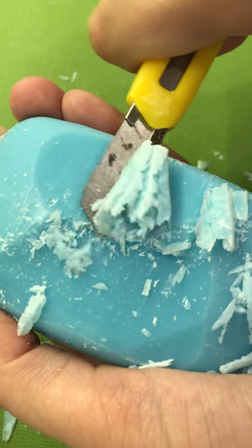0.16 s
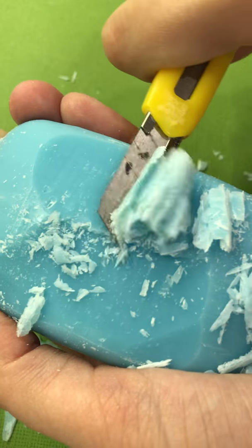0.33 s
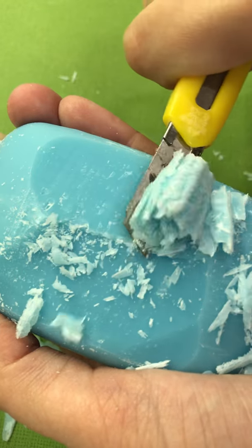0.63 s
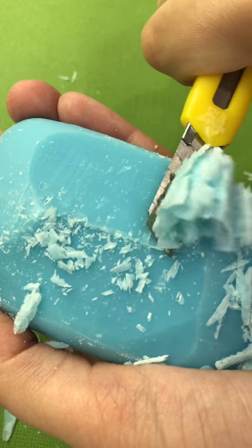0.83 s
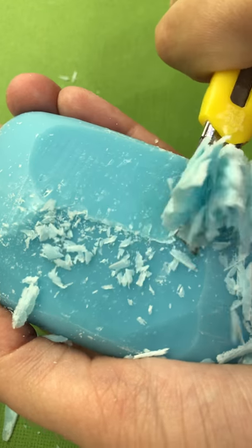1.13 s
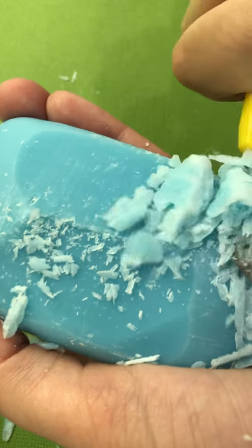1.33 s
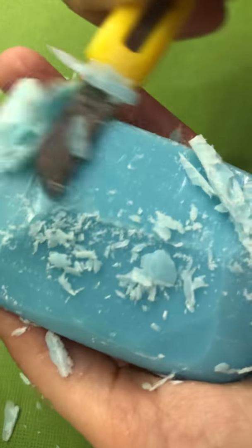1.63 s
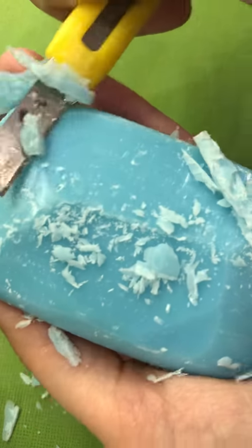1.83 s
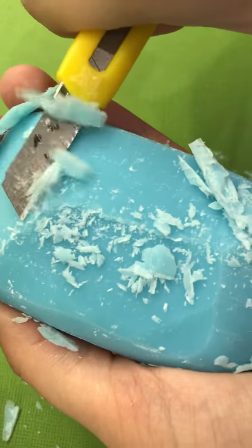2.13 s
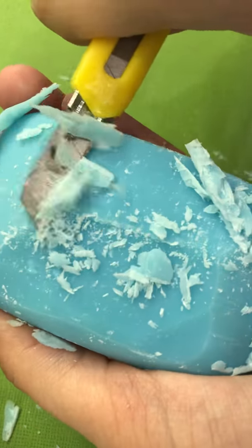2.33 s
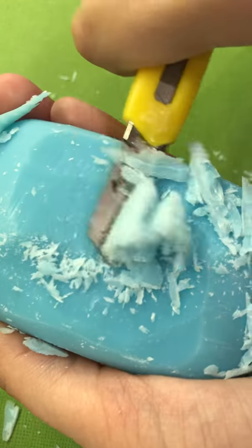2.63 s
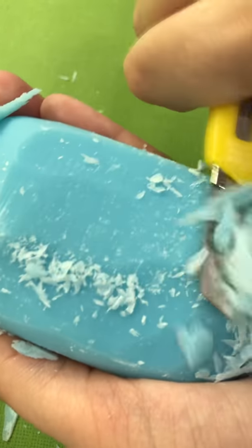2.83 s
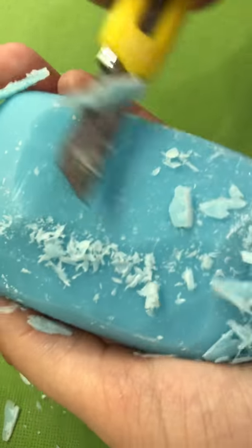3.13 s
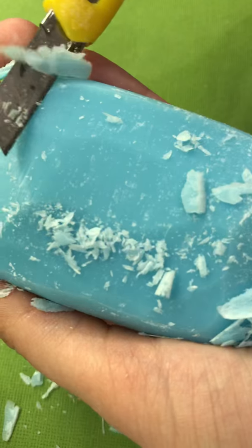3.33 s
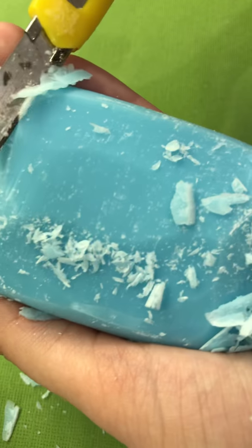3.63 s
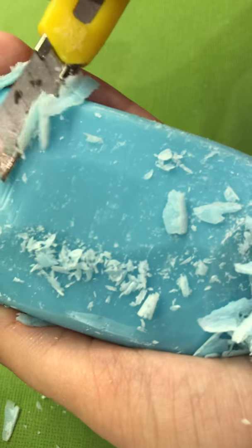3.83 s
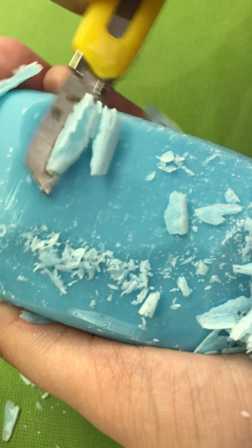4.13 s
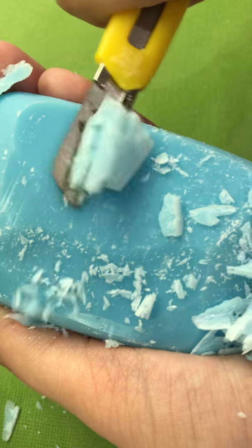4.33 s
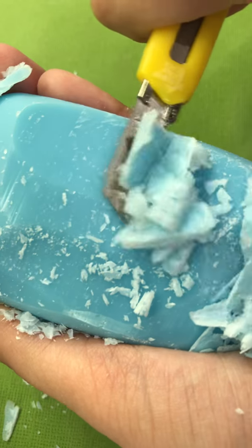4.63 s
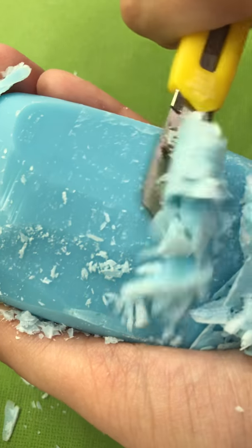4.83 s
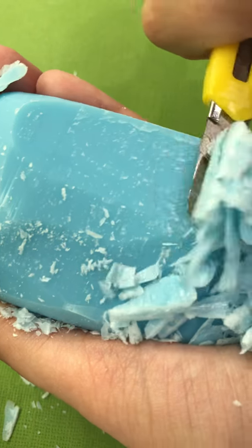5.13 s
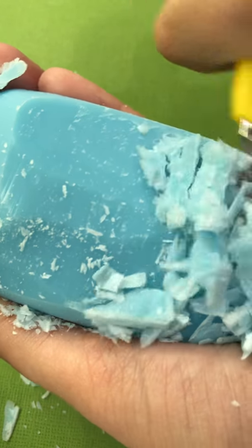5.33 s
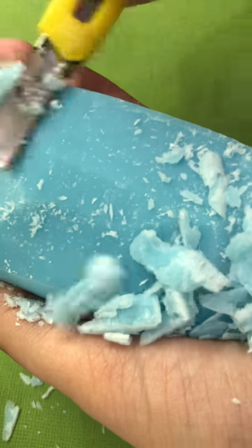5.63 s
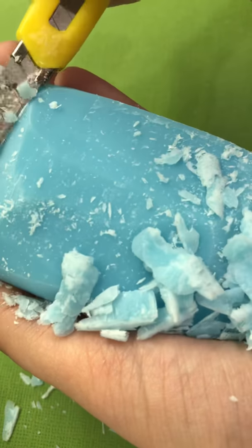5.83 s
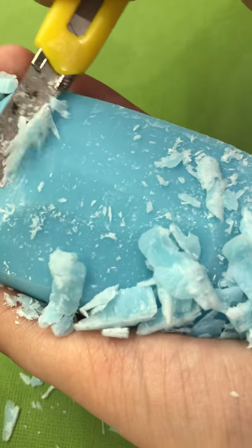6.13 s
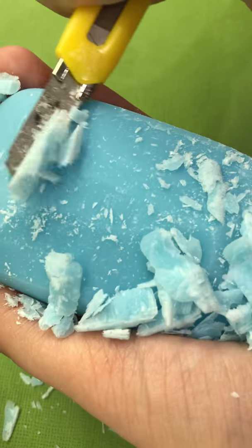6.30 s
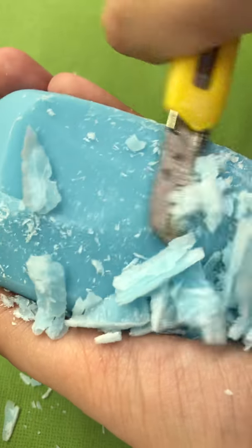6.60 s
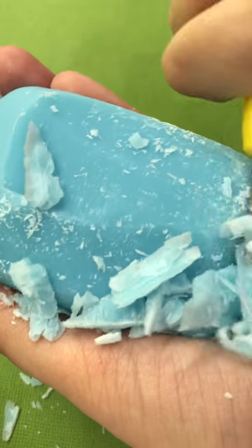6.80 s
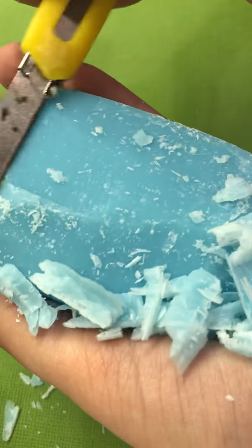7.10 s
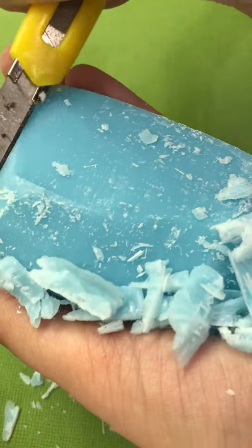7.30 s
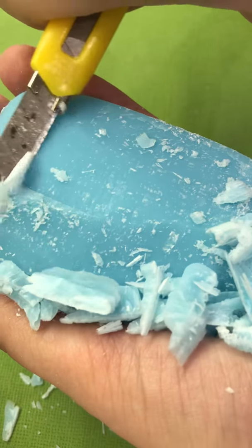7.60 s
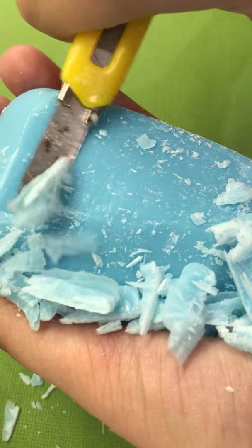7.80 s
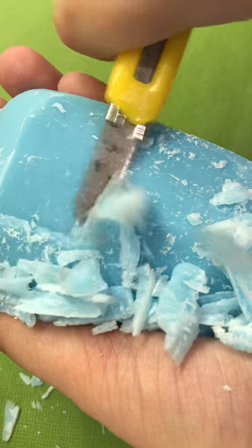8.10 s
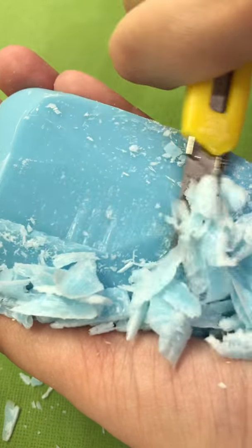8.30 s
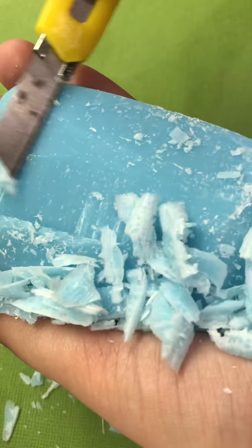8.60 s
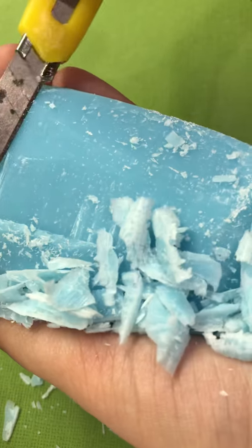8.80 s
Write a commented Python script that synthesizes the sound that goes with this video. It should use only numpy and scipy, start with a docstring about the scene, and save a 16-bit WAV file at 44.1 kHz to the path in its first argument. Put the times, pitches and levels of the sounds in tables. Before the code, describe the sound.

Close, dry soap carving: irregular sharp snaps and crackles from breaking flakes, grainy rubbing of the blade, faint room hum and hiss.

```python
"""Brittle cracks, soft rubs and crackling crumbs, over a low hum and hiss: a thin snap-off blade
shaves a dry bar of soap held in the hand, close to a phone in a quiet room.
Each crack is a burst of force that rings knife and bar, the flake itself, and a bright snap.
Slips, scrapes and stray crumbs drive the same resonances with grainy noise; big flakes knock the bar.
Hum, hiss and dull hand thuds are shaped noise; decaying noise gives the near and late room."""
import sys
import numpy as np
from scipy import signal
from scipy.fft import rfft, irfft, next_fast_len
from scipy.io import wavfile
from scipy.ndimage import map_coordinates

SR = 44100
rng = np.random.default_rng(int(sys.argv[2]) if len(sys.argv) > 2 else 0)


def transcribe(u):
    """Save the signal u as a 16-bit wav file named by the first command-line argument.

    u: samples, shape (n,) or (channels, n), limited to [-1, 1]; the rate is SR.
    q: integer samples, one column per channel.
    """
    v = np.clip(np.atleast_2d(u).T, -1, 1)
    q = np.round(v * 32767).astype(np.int16)
    wavfile.write(sys.argv[1], SR, q)


N = 394694
FORCE_SAMPLES = 2048  # length of one force burst
SWELL_STEP = 64  # samples per gain step

# resonances of knife and bar: (centre [Hz], width [Hz], relative level [dB])
KNIFE_MODES = [(596, 330, 0.5), (970, 330, 2), (1342, 270, 0.5), (1549, 170, -3), (2205, 249, 2),
               (2565, 230, 0), (3290, 320, 2.5), (4470, 400, -6.5)]
# resonances of the flake: (centre [Hz], width [Hz], relative level [dB])
FLAKE_MODES = [(4510, 1300, -9.5), (5500, 1010, 0), (6430, 516, 0.5), (6854, 410, -2), (8620, 1020, -5.5)]
# resonances of the bright snap: (centre [Hz], width [Hz], relative level [dB])
SNAP_MODES = [(9295, 890, -6), (11260, 430, -1), (12630, 1500, -3.5), (15100, 980, -5)]


def amp(db):
    """Gain of a level in dB."""
    return 10 ** (np.asarray(db) / 20)


def unit(x):
    """x at rms 1."""
    return x / np.sqrt(np.mean(x ** 2) + 1e-20)


def along(points, hz):
    """Interpolate (Hz, value) points on a log frequency axis."""
    point_hz, values = np.transpose(points)
    return np.interp(np.log(hz + 1), np.log(point_hz + 1), values)


def wobble(knots_per_s):
    """Smooth random curve through normal-distributed knots."""
    knots = rng.standard_normal(int(N * knots_per_s / SR) + 4)
    return map_coordinates(knots, [np.arange(N) * knots_per_s / SR])


def filtered(x, response):
    """x times a complex response of frequency."""
    size = next_fast_len(N + SR // 2)
    hz = np.fft.rfftfreq(size, 1 / SR)
    return irfft(rfft(x, size) * response(hz), size)[..., :N]


def shaped_noise(response):
    """White noise through a response, rms 1."""
    return unit(filtered(rng.standard_normal(N), response))


def resonances(hz, modes):
    """One causal second-order resonance per mode, of alternating sign."""
    centre_hz, width_hz, db = np.moveaxis(modes, -1, 0)[..., None]
    sign = (-1.) ** np.arange(centre_hz.shape[-2])[:, None]
    damping = 1j * hz * width_hz
    return sign * amp(db) * damping / (centre_hz ** 2 - hz ** 2 + damping)


def rung(x, modes):
    """x through the summed resonances of a body."""
    return filtered(x, lambda hz: resonances(hz, modes).sum(0))


def struck(start_s, peak_db, force, modes, scatter_db, best_hz=None, fall_db_per_octave=0):
    """Each force row rings modes of new strengths; the grip pulls the nearest mode to best_hz."""
    body = np.tile(np.array(modes, float), (len(start_s), 1, 1))
    body[..., 2] += scatter_db * rng.standard_normal((len(start_s), len(modes)))
    if best_hz is not None:
        octaves = np.abs(np.log2(body[..., 0] / best_hz[:, None]))
        body[..., 2] -= fall_db_per_octave * (octaves - octaves.min(1)[:, None])
        rows, nearest = np.arange(len(start_s)), octaves.argmin(1)
        body[rows, nearest, 0] = best_hz
        body[rows, nearest, 2] = np.max(modes, axis=0)[2]  # top level of the mode table
    size = 2 * force.shape[1]
    response = resonances(np.fft.rfftfreq(size, 1 / SR), body).sum(1)
    sound = irfft(rfft(force, size) * response, size)
    sound *= (amp(peak_db) / np.abs(sound).max(1))[:, None]
    first = np.round(np.clip(start_s, 0, None) * SR).astype(int)
    at = first[:, None] + np.arange(size)
    return np.bincount(at.ravel(), sound.ravel(), N + SR)[:N]


def breaking(count, rise_s, t60_s, crumble_db, crumble_t60_s, jolt_db):
    """Force of a break: a quick noisy tear, one sharp jolt, then small follow-up breaks that die away."""
    jolt_s = 0.0008  # from the start of the tear
    t = np.arange(FORCE_SAMPLES) / SR
    tear = amp(-60 * t / t60_s) * (1 - np.exp(-(t / rise_s) ** 2))
    pieces_db = np.repeat(4 * rng.standard_normal((count, 32)), 64, axis=1)  # 32 pieces of 64 samples
    crumble = amp(crumble_db - 60 * t / crumble_t60_s + pieces_db)
    jolt = amp(jolt_db) * (np.arange(len(t)) == round(jolt_s * SR))
    return jolt + (tear + crumble * (t > rise_s)) * rng.standard_normal((count, len(t)))


def grit(breaks_per_s, spread_db):
    """Scattered tiny breaks of unequal size, in clumps, rms 1."""
    breaks = rng.random(N) < breaks_per_s / SR * amp(5 * wobble(40))
    size = amp(spread_db * np.minimum(rng.exponential(size=N), 3.5))
    return unit(breaks * rng.standard_normal(N) * size)


def swells(start_s, held_s, db, rise_db_per_s, fall_db_per_s):
    """Summed gain of events that rise to full strength at start_s, hold and fall at steady dB rates."""
    t = np.arange(0, N, SWELL_STEP) / SR - start_s[:, None]
    rise_db = rise_db_per_s * np.minimum(t, 0)
    fall_db = fall_db_per_s * np.maximum(t - held_s[:, None], 0)
    gain = amp(db[:, None] + rise_db - fall_db).sum(0)
    return np.repeat(gain, SWELL_STEP)[:N]


def cracks():
    """Each crack drives three bodies; the heavy knife speaks slower than flake and snap."""
    # cracks: (start [s], knife-and-bar peak [dB], strongest knife ring [Hz], flake peak [dB], snap peak [dB])
    crack_table = [(0.0075, -43.5, 3230, -52.5, -62), (0.0645, -46, 3150, -54, -57),
                   (0.115, -43.5, 2600, -51, -54), (0.2157, -50.5, 2420, -52, -54),
                   (0.317, -44, 3220, -57, -53), (0.6348, -58, 3400, -49, -40),
                   (0.846, -58, 2620.0, -54, -43), (0.8709, -53, 3300, -43, -37.5),
                   (0.894, -58, 3300, -55, -57), (0.911, -67, 3270.0, -42, -41.5),
                   (1.0667, -42, 2873, -39, -38), (1.1536, -55, 3750, -40.5, -45),
                   (1.166, -59, 3300, -46, -59), (1.2325, -49.5, 3420, -42.5, -45),
                   (1.2716, -42, 4240, -39.5, -34.5), (1.2992, -40.5, 4200, -46, -53),
                   (1.3265, -52, 4190.0, -41, -44), (1.4264, -49, 885, -40, -43),
                   (1.478, -47, 2120, -39.5, -61), (1.506, -49, 2170, -34, -36),
                   (1.508, -43.5, 2150, -34.5, -36), (1.537, -52.5, 2140.0, -47, -43),
                   (1.5723, -73, 3200.0, -45.5, -63), (1.6334, -40.5, 3330, -32.5, -30.5),
                   (1.6438, -49, 3000.0, -28, -55), (1.651, -58, 3550.0, -31, -46),
                   (1.6572, -45, 3790.0, -28, -51.0), (1.701, -46.5, 3400.0, -33.5, -61),
                   (1.753, -53.5, 3340.0, -47.5, -59), (1.821, -55, 1590, -42, -38),
                   (1.827, -45, 2280, -59, -61), (1.869, -44.5, 2680, -46, -49),
                   (1.899, -63, 3920.0, -35, -39), (1.9069, -62, 3920.0, -22, -21.5),
                   (1.9513, -46, 3650, -38, -61), (1.975, -71, 3040.0, -42, -43),
                   (2.094, -54, 640.0, -41.5, -40), (2.1303, -64, 4200, -48, -50),
                   (2.135, -45, 3900, -26.5, -25.5), (2.1662, -48, 1040, -35, -50),
                   (2.183, -62, 4400, -40, -45), (2.1863, -35.5, 3050, -45.5, -46),
                   (2.2208, -40, 2660, -37, -49), (2.228, -63, 2750.0, -42, -38),
                   (2.2362, -39, 2830, -42, -57), (2.263, -67, 3000, -46, -51),
                   (2.277, -37, 3050, -51, -62), (2.333, -40.5, 3080, -51, -56),
                   (2.429, -43.5, 3100, -46.5, -42), (2.514, -46.5, 2620, -53, -50),
                   (2.753, -55.5, 3260, -60, -45), (2.76, -48, 2230, -49, -52),
                   (2.798, -58, 2500.0, -40.5, -38), (2.9365, -16.5, 3290, -12.5, -11),
                   (2.9837, -64.5, 2370, -38, -44), (3.067, -27, 2175, -34.5, -25),
                   (3.089, -39, 3530, -43, -41), (3.097, -39.5, 2580, -58, -37),
                   (3.167, -60, 3600, -41, -44), (3.2514, -42, 1442, -33, -48),
                   (3.262, -40.5, 2100, -29, -36), (3.28, -34, 2820, -16.5, -27),
                   (3.285, -36.5, 1490, -21, -27), (3.314, -40.5, 3360, -44, -60),
                   (3.332, -58, 3900, -42, -52), (3.352, -37, 4130, -37, -43),
                   (3.3934, -71.5, 3940.0, -31, -35), (3.438, -64, 3600, -48, -53),
                   (3.47, -66, 3650, -46.5, -43), (3.6669, -47.5, 3040, -54.5, -77),
                   (3.7447, -46.5, 2570, -59, -77), (4.2447, -42.5, 2310, -52.5, -47),
                   (4.296, -58, 3300, -38, -44), (4.3, -39.5, 3400, -22.5, -25),
                   (4.3554, -54, 1530, -42, -56), (4.4988, -53, 2340, -54, -31.5),
                   (4.503, -49.5, 2150, -47, -57), (4.612, -70, 1170.0, -63, -45.5),
                   (4.714, -71, 1330, -51.5, -51.5), (4.749, -53, 2510, -57, -41),
                   (4.903, -59, 2300, -52.5, -52), (5.076, -49.5, 2280, -45, -48),
                   (5.24, -53, 3280, -42, -69), (5.275, -41.5, 2270, -48, -52),
                   (5.432, -32.5, 3440, -37.5, -44), (5.463, -46, 2490, -40.5, -46),
                   (5.499, -35, 2350, -44, -37), (5.512, -37, 3200, -55, -30),
                   (5.555, -40, 3200, -43.5, -69), (5.58, -48, 2320, -55, -46),
                   (5.726, -49, 2980, -65, -62), (5.7468, -58, 3360.0, -29.5, -24),
                   (5.769, -46.5, 3400, -43, -40), (5.7846, -55, 3860, -46, -33),
                   (5.7932, -52, 4400, -39, -45), (5.8105, -68, 3960.0, -40.5, -43),
                   (5.856, -61.5, 4400, -44, -60), (5.864, -45, 3140, -44, -58),
                   (5.8875, -66, 3300, -52, -50), (5.897, -56, 3300, -41, -56),
                   (5.915, -50, 3050.0, -34, -45.0), (5.9225, -49, 1440, -25.5, -30),
                   (5.928, -44, 1420, -24.5, -36), (5.9555, -67, 4400, -45, -60),
                   (5.9703, -24, 2300, -24, -28), (5.996, -65, 4030, -24.5, -52),
                   (6.186, -45, 3050, -51.5, -53.5), (6.3083, -84, 2080, -51.5, -42),
                   (6.386, -58, 1750, -50.5, -41.5), (6.5269, -49, 2290, -49, -37),
                   (6.532, -47.5, 1960, -52, -48), (6.591, -36.5, 2090, -48, -44),
                   (6.743, -39, 1570, -36.5, -37), (6.7637, -40, 2600, -25, -33),
                   (6.786, -64, 3920.0, -45, -45), (6.8005, -43, 3840, -36, -37),
                   (6.8776, -46.5, 3350, -66, -76), (6.891, -69, 3300, -44, -47),
                   (6.8972, -31, 2200, -33.5, -39), (6.9234, -29, 3020, -39, -31.5),
                   (6.9333, -31.5, 2760.0, -69, -37), (6.9552, -56, 3760.0, -28.5, -49.0),
                   (6.9786, -25.5, 3220, -43, -18), (6.995, -39, 2470.0, -53, -42),
                   (7.0258, -36, 2400.0, -39, -42), (7.037, -33.5, 2270, -25.5, -30),
                   (7.0565, -33.5, 2340, -35, -35), (7.0845, -30, 2320, -38, -36),
                   (7.097, -47, 2500, -43, -46), (7.1327, -37, 3150, -53, -58),
                   (7.1411, -29.5, 4470, -39.5, -35), (7.1713, -46, 2160, -53, -60),
                   (7.376, -53, 1960, -37.5, -65), (7.409, -76.5, 3940.0, -41.5, -66),
                   (7.687, -49.5, 2260, -58, -52.5), (7.773, -81, 3700, -46.5, -41),
                   (7.9035, -51, 3140, -42, -37), (8.0364, -54.5, 2200, -60, -42),
                   (8.0854, -35, 2180, -42, -33.5), (8.13, -39, 2160, -48, -47),
                   (8.1832, -33.5, 2100, -45, -44.5), (8.226, -42.5, 2160, -45.5, -60),
                   (8.255, -46, 3150, -64, -53), (8.461, -39.5, 2210, -37, -37),
                   (8.5177, -34.5, 2740, -62, -43), (8.5686, -37, 2908, -44, -45),
                   (8.693, -45.5, 3170, -41.5, -50), (8.71, -70.5, 3330, -61, -47),
                   (8.734, -50, 3380, -57, -71)]
    start_s, knife_db, knife_hz, flake_db, snap_db = np.transpose(crack_table)
    # a flake that breaks free of the knife snaps at once; one that drags on it tears slowly
    knife_lead_db = knife_db - np.maximum(flake_db, snap_db)
    drag = np.clip(1 + knife_lead_db / 22, .4, 1.6)[:, None]
    slow = breaking(count=len(start_s), rise_s=0.001 * drag, t60_s=0.017,
                    crumble_db=-20.5, crumble_t60_s=0.053, jolt_db=23.5 - 15.2 * drag)
    quick = breaking(count=len(start_s), rise_s=0.0006 * drag ** 2, t60_s=0.013 * drag,
                     crumble_db=-21.5, crumble_t60_s=0.049, jolt_db=16.5 - 11.1 * drag)
    knife = struck(start_s, knife_db, slow, KNIFE_MODES, scatter_db=3.0,
                   best_hz=knife_hz, fall_db_per_octave=12.5)
    flake = struck(start_s, flake_db, quick, FLAKE_MODES, scatter_db=2.0)
    snap = struck(start_s, snap_db, quick, SNAP_MODES, scatter_db=2.0)
    return knife + flake + snap


def knocks():
    """Hollow knocks of the bar as big flakes break or land: a soft blow into the low modes alone."""
    # knocks: (start [s], peak [dB], strongest ring [Hz])
    knock_table = [(1.272, -48.5, 1280), (1.634, -47, 880), (2.086, -44, 596), (2.935, -30, 1620),
                   (5.92, -47.5, 1110), (6.746, -39.5, 1040), (6.898, -46.5, 886), (8.402, -52, 1000),
                   (8.462, -48, 865)]
    start_s, peak_db, best_hz = np.transpose(knock_table)
    blow = breaking(count=len(start_s), rise_s=0.0017, t60_s=0.028,
                    crumble_db=-34.0, crumble_t60_s=0.0197, jolt_db=-1)
    return struck(start_s, peak_db, blow, KNIFE_MODES[:4], scatter_db=1,
                  best_hz=best_hz, fall_db_per_octave=38.0)


def slips():
    """A slip of the edge swells and fades: grainy rubbing into the knife, with a little crumbling."""
    # slips: (middle [s], knife-and-bar peak [dB], strongest knife ring [Hz], crumb peak [dB], length [s])
    slip_table = [(0.139, -50, 2600, -55, 0.0082), (0.198, -56, 2500, -64, 0.01),
                  (0.37, -52.5, 3110.0, -55, 0.0096), (0.599, -54.5, 2200, -59, 0.0079),
                  (1.286, -40.5, 3300, -54, 0.023), (1.6596, -39, 6300, -40, 0.0083),
                  (2.654, -46.5, 2270, -50, 0.0065), (2.673, -50.5, 2570, -54, 0.014),
                  (2.835, -46.5, 2200, -66, 0.017), (2.89, -45.5, 3130, -49.5, 0.02),
                  (3.705, -55, 2210.0, -59, 0.009), (3.78, -53.5, 2630, -67, 0.012),
                  (3.859, -55, 2450, -61, 0.01), (4.375, -54, 2300, -49, 0.02),
                  (4.654, -59, 2200, -51.5, 0.028), (4.984, -58.5, 3050, -53.5, 0.02),
                  (5.169, -54.5, 1370, -51.5, 0.032), (5.291, -41, 3260, -39, 0.015),
                  (5.62, -52.5, 2250.0, -66, 0.0068), (6.076, -51.5, 3140, -65, 0.013),
                  (6.238, -52.5, 2210, -55, 0.015), (6.694, -50, 3100, -53, 0.014),
                  (6.713, -51, 3210.0, -59, 0.01), (7.077, -31.5, 2230, -27, 0.012),
                  (7.495, -51, 2280, -57, 0.036), (7.578, -50, 2180, -58.5, 0.01),
                  (7.807, -54.5, 2520, -58, 0.0099), (8.214, -48, 2200.0, -50, 0.0099),
                  (8.281, -48.5, 2930, -56, 0.039), (8.504, -42, 4800, -47, 0.011)]
    middle_s, knife_db, ring_hz, crumb_db, length_s = np.transpose(slip_table)
    t = np.arange(FORCE_SAMPLES) / SR
    half_s = t[-1] / 2
    swell = np.exp(-((t - half_s) / (0.5 * length_s[:, None])) ** 2)
    grain = amp(1.2 * rng.exponential(size=swell.shape)) * rng.standard_normal(swell.shape)
    force = swell * grain
    start_s = middle_s - half_s
    knife = struck(start_s, knife_db, force, KNIFE_MODES, scatter_db=3.0,
                   best_hz=ring_hz, fall_db_per_octave=8)
    crumbs = struck(start_s, crumb_db, force, FLAKE_MODES + SNAP_MODES, scatter_db=3)
    return knife + crumbs


def stroke():
    """The edge rubs knife and flake, most near each scrape's pitch, and crumbs break under it."""
    # scrapes: (full strength from [s], held [s], rubbing level before the 3 dB cut below [dB],
    # pitch it sings at [Hz], crumb level [dB])
    scrape_table = [(0.0, 0.0084, -68, 3200, -76), (0.88, 0.051, -91, 3300, -74),
                    (1.28, 0.03, -59, 3900, -61), (1.5, 0.0071, -61, 2300, -62),
                    (1.65, 0.045, -62, 3500, -62), (1.92, 0.023, -70, 3700, -67),
                    (2.15, 0.0096, -56.5, 2770, -62), (2.22, 0.0061, -58.5, 2800, -64),
                    (2.808, 0.012, -55.5, 2920, -59), (2.96, 0.091, -62.5, 3440, -66),
                    (3.08, 0.14, -65, 3470, -66.5), (3.27, 0.062, -65, 3300, -64),
                    (3.43, 0.086, -73.5, 5200, -77.5), (4.309, 0.033, -72.5, 3260, -66),
                    (5.281, 0.042, -67.5, 3020, -65.5), (5.47, 0.039, -58.5, 2420, -65),
                    (5.6, 0.08, -72, 2220, -84), (5.755, 0.027, -59.5, 4360, -59),
                    (5.915, 0.018, -70, 2620, -59), (6.571, 0.059, -55.5, 2320, -63.5),
                    (6.762, 0.017, -52, 2730, -53), (6.967, 0.011, -50.5, 2200, -60),
                    (7.025, 0.04, -47, 2300, -53), (7.16, 0.023, -59, 3470, -70),
                    (7.3, 0.073, -70.5, 3300, -71), (8.22, 0.19, -65, 2700, -69.5),
                    (8.497, 0.035, -60, 5100, -67)]
    start_s, held_s, rub_db, rub_hz, crumb_db = np.transpose(scrape_table)
    bite_db_per_s, ease_db_per_s = 448.5, 280
    linger_db, linger_db_per_s = -21.5, 30  # the edge drags on faintly

    def scrape_gain(db):
        """Main swell plus the faint, slower-dying drag."""
        main = swells(start_s, held_s, db, bite_db_per_s, ease_db_per_s)
        return main + swells(start_s, held_s, db + linger_db, bite_db_per_s, linger_db_per_s)

    edge = grit(breaks_per_s=1200, spread_db=4.0)
    rub = 0
    for mode in KNIFE_MODES[3:] + FLAKE_MODES[1:4]:
        off_pitch_db = np.minimum(22 * np.abs(np.log2(mode[0] / rub_hz)), 12)
        # each mode has its own shift of the grit and its own wobble, so the colour shifts
        ring = unit(rung(np.roll(edge, round(mode[0])), [mode]))
        rub = rub + scrape_gain(rub_db - off_pitch_db) * amp(2.8 * wobble(45)) * ring
    crumbs = grit(breaks_per_s=1800, spread_db=4.0)
    flake_fizz = amp(3.5 * wobble(39)) * rung(crumbs, FLAKE_MODES)
    snap_fizz = amp(1.5 + 4.8 * wobble(27)) * rung(crumbs, SNAP_MODES)
    return amp(-3.0) * rub + scrape_gain(crumb_db) * unit(flake_fizz + snap_fizz)


def strays():
    """Loose crumbs tick faintly: dull ones against the knife, bright ones as they split."""
    dull = unit(rung(grit(breaks_per_s=45, spread_db=1.5), KNIFE_MODES[4:] + FLAKE_MODES))
    bright = unit(rung(grit(breaks_per_s=30, spread_db=1.5), FLAKE_MODES[2:] + SNAP_MODES))
    return amp(-80.5) * dull + amp(-82.5) * bright


def hand_thuds():
    """Dull thuds as the hands move: low noise that swells and dies."""
    # thuds: (full strength from [s], held [s], level [dB])
    thud_table = [(5.152, 0.19, -60), (6.6, 0.015, -46.5), (8.09, 0.17, -49.5)]
    # thud spectrum: (frequency [Hz], relative density [dB])
    thud_spectrum = [(20, -34), (40, -12), (100, -0.5), (146, -15), (260, -19.5), (400, -44.5), (880, -120)]
    thud = shaped_noise(lambda hz: amp(along(thud_spectrum, hz)))
    start_s, held_s, db = np.transpose(thud_table)
    return swells(start_s, held_s, db, rise_db_per_s=147, fall_db_per_s=91) * thud


def room_tone():
    """Low hum from noise through the room's resonances, and steady hiss from shaped noise."""
    # low room resonances: (centre [Hz], width [Hz], relative level [dB])
    hum_modes = [(56, 25.8, -2), (100.5, 20.9, 0), (131.4, 20.3, -2.5), (168.1, 11.3, -4), (200.3, 25, -12),
                 (264.3, 25.3, -11.5), (311, 28, -13.5), (406.3, 16, -19)]
    # room tone and hiss spectrum: (frequency [Hz], relative density [dB])
    air_spectrum = [(240, -21), (400, 1), (563, -7), (1000, -7.5), (1930, -17.5), (2550, -14.5),
                    (4750, -19.5), (5730, -22), (9280, -21.5), (10300, -24), (13100, -20.5), (15700, -22),
                    (16500, -42)]
    rumble = filtered(rng.standard_normal(N), lambda hz: hz ** 3 / (hz ** 3 + 40 ** 3))  # low cut at 40 Hz
    hum = unit(rung(rumble, hum_modes))
    air = shaped_noise(lambda hz: amp(along(air_spectrum, hz)))
    return amp(-59.5) * hum + amp(-69.5) * air


def room(x, decays):
    """Answer of a room: unit-energy noise in which each frequency dies at its own speed."""
    hz, t, spectrum = signal.stft(rng.standard_normal(SR // 2), SR, nperseg=256)
    decay = amp(-60 * t / along(decays, hz)[:, None])
    tail = signal.istft(spectrum * decay, SR, nperseg=256)[1]
    delayed = np.pad(x, (150, 0))  # samples
    return signal.oaconvolve(delayed, tail / np.linalg.norm(tail))[:N]


def scene():
    """Hits with the answer of table top, near walls and room; stroke, thuds and room tone without it."""
    # decay of table top and near walls: (frequency [Hz], t60 [s])
    near_decays = [(1000, 0.14), (4000, 0.044), (15000, 0.035)]
    # decay of the whole room's faint tail: (frequency [Hz], t60 [s])
    late_decays = [(1000, 0.47), (4000, 0.49), (15000, 0.27)]
    hits = cracks() + knocks() + slips() + strays()
    near = amp(-12.5) * room(hits, near_decays)
    late = amp(-20) * room(hits, late_decays)
    return (hits + near + late + stroke() + hand_thuds() + room_tone())[None]


def record(dry):
    """Dulls the very top: a 12 dB step down by 16 kHz, nothing above 16.9 kHz."""
    top_hz = 16900

    def response(hz):
        step = amp(np.interp(hz, [15700, 16000], [0, -12]))
        return step / (1 + (hz / top_hz) ** 100)

    return filtered(dry, response)


dry = scene()
out = record(dry)
transcribe(out)
```